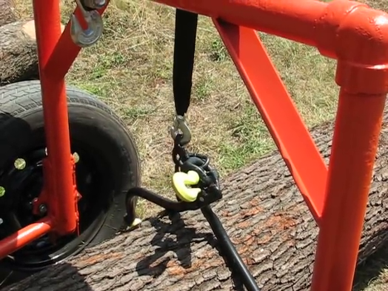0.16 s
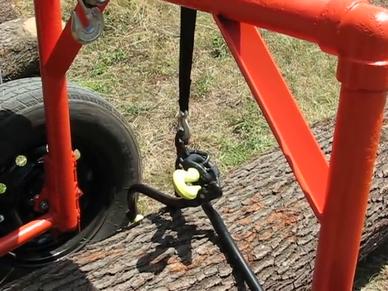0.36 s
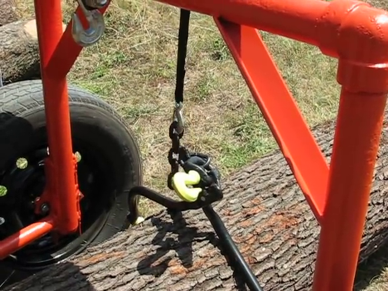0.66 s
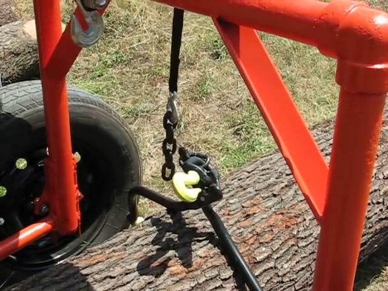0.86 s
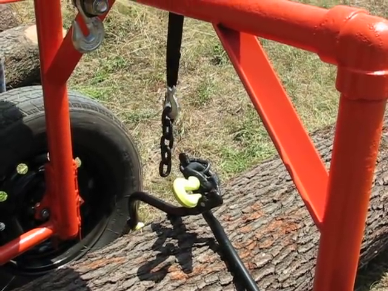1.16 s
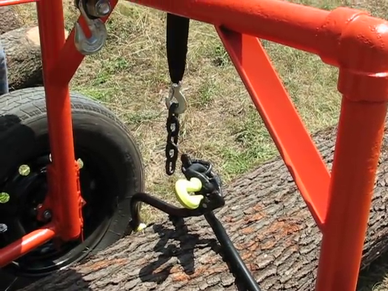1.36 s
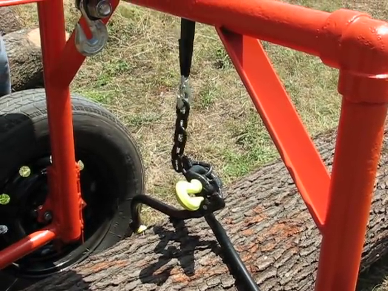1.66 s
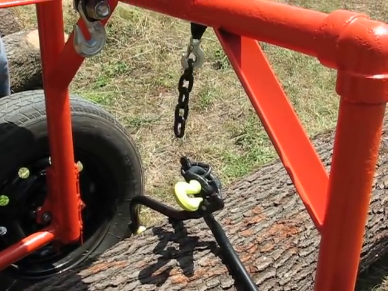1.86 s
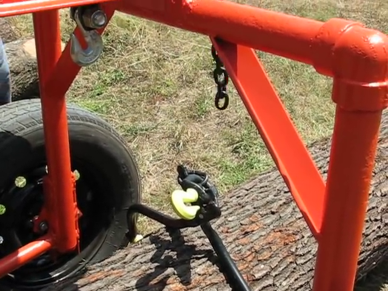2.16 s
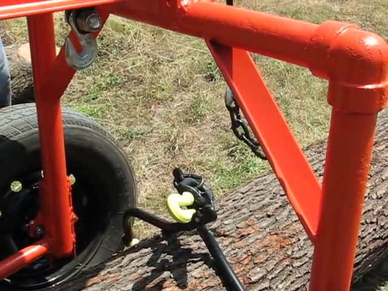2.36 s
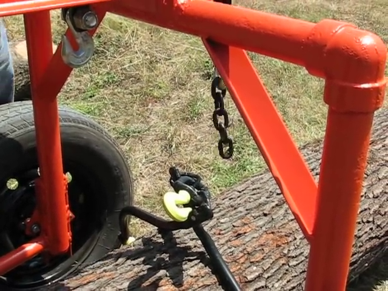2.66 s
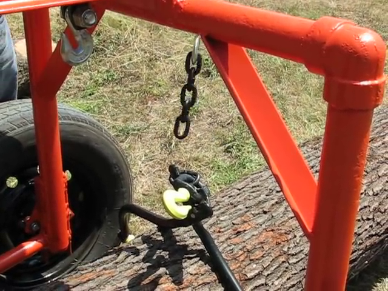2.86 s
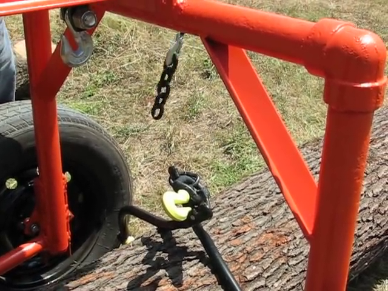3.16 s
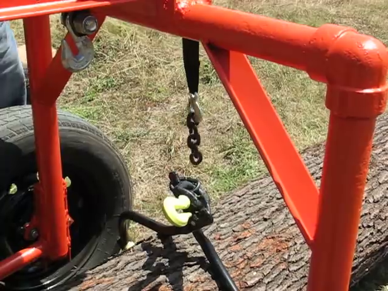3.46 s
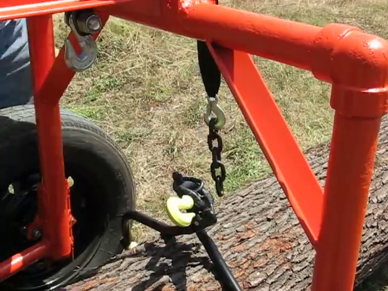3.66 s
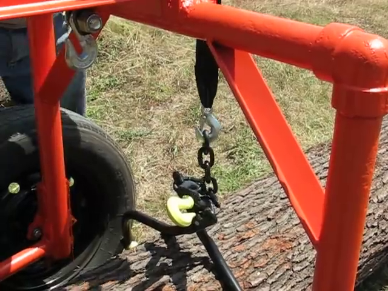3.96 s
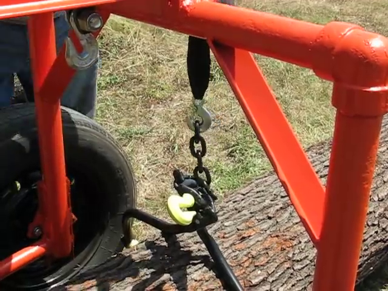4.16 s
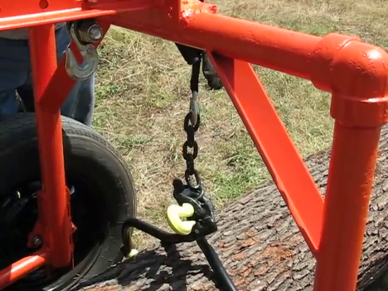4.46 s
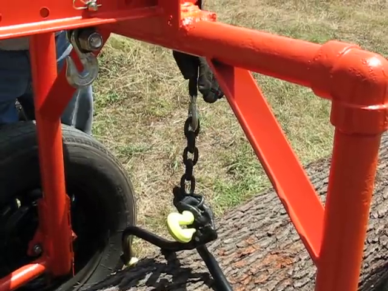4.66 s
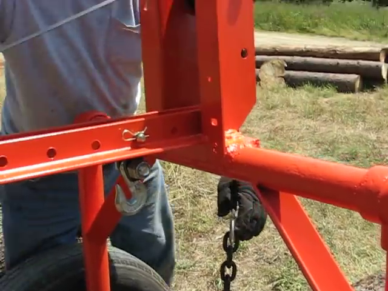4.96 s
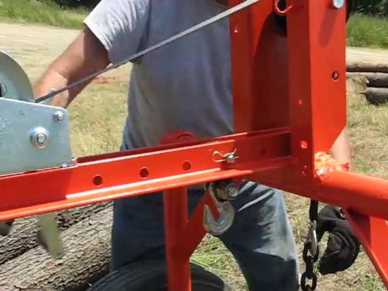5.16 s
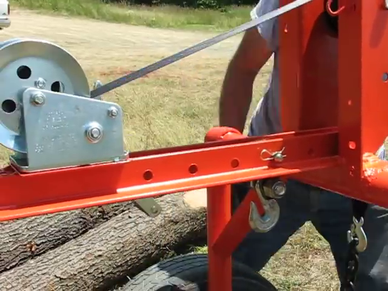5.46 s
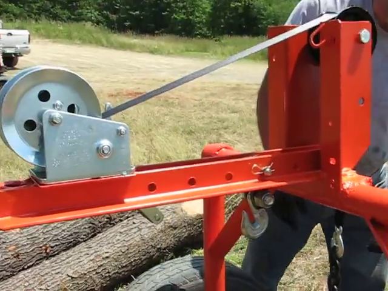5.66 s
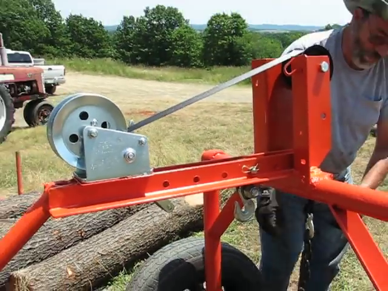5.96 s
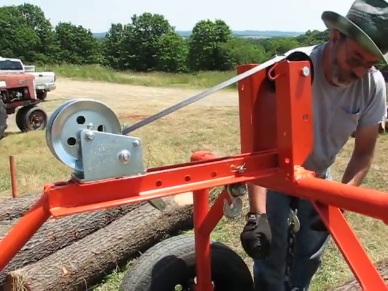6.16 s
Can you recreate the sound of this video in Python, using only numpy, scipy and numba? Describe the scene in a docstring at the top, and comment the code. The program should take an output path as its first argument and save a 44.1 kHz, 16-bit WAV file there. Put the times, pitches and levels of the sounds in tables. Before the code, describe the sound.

Loud, crisp metal clicks come in two bursts as a hand-cranked winch ratchets in an open field, heard from close up. Between the bursts there are small steel knocks, light clinks of swinging chain and a barely audible bird. The second burst is longer and quickens near its end, finishing with ringing clunks from the steel frame and a quiet bump. Faint wind and a far engine hum sit behind it all.

```python
"""Hand winch on a steel log arch

The winch is cranked in two bursts outdoors: each impact of the pawl on a ratchet tooth excites the
modes of winch and arch. Between the bursts the lifted chain swings and clinks and a bird calls; a dull
bump comes last. Light wind and a distant engine lie underneath. The close camera whines faintly and
rises near the end; its gain control ducks at loud clicks and creeps back in the pauses."""
import sys
import numpy as np
from scipy import signal
from scipy.fft import rfft, irfft, next_fast_len
from scipy.io import wavfile
from scipy.ndimage import uniform_filter1d, map_coordinates
from numba import njit

SR = 44100
rng = np.random.default_rng(int(sys.argv[2]) if len(sys.argv) > 2 else 0)


def bounce(signal):
    """Save signal as a 16-bit WAV file at the path given by the first command-line argument."""
    frames = np.transpose(np.atleast_2d(signal))
    limited = np.clip(frames, -1, 1)
    pcm = np.round(limited * 32767).astype(np.int16)
    wavfile.write(sys.argv[1], SR, pcm)


N = 278712
TIME = np.arange(N) / SR
AGE = np.arange(SR * 3 // 4) / SR  # time after a blow, s
SIDES = np.array([[.5], [-.5]])  # splits a left-right difference between the microphone ports

# long-lived modes of the arch: f/Hz, level/dB, t60/s
ARCH_MODES = [(328, -54, .5), (372, -55, .4), (435, -54, .35), (598, -56, .46), (770, -54, .35),
              (829, -53, .5), (1060, -43, .3), (1540, -48, .5), (1875, -43, .22), (2200, -45, .3),
              (3273, -41, .4), (3305, -46, .3), (3413, -41, .3), (6245, -41, .5), (6350, -42, .4),
              (6500, -42, .3), (6750, -43, .28), (8495, -38, .2), (11628, -46, .17), (14310, -55, .3)]
# spectrum of the clattering winch plates: f/Hz, level/dB
CLATTER_SPECTRUM = [(100, -45), (400, -21.5), (750, -15), (1150, 7), (1420, 2.5), (2400, -3), (3300, -4),
                    (4300, 3), (5600, -1.5), (7200, 1), (9000, -5), (9800, -9), (12300, -8), (15500, -29.5)]
# spectrum of a knock on steel: f/Hz, level/dB
KNOCK_SPECTRUM = [(80, -35.5), (250, -8), (450, -0.5), (750, -4.5), (1100, -1), (2100, 1.5), (3000, -3.5),
                  (4300, -0.5), (7500, -8), (14000, -40.5)]
# a hard crack on the first ratchet click after each pause: t/s, level/dB, t60/s, slack knock level/dB
SHARP_CRACKS = [(0.0262, 12, 0.011, -39), (.508, 9, 0.013, -28), (3.559, 0.5, 0.028, -24.5)]


def amp(db):
    """Amplitude ratio of a level in decibels."""
    return 10 ** (np.asarray(db) / 20)


def unit(x):
    """Normalisation to rms 1."""
    return x / np.sqrt(np.mean(x ** 2) + 1e-20)


def along(points, hz):
    """Interpolation of (f/Hz, value) points on a logarithmic frequency axis."""
    f, v = np.transpose(points)
    return np.interp(np.log(hz + 1), np.log(f + 1), v)


def fade(t60):
    """Exponential decay, by 60 dB in t60 seconds."""
    return np.exp(-np.log(1000) * AGE / t60)


def rise(tau):
    """Exponential build-up with a time constant of tau seconds."""
    return 1 - np.exp(-AGE / tau)


def tone(hz):
    """A sinusoid whose phase is the integral of its frequency."""
    return np.sin(2 * np.pi * np.cumsum(hz) / SR)


def wobble(rate):
    """Smooth random fluctuation through `rate` values a second."""
    return map_coordinates(rng.standard_normal(200), [TIME * rate], mode="mirror")


def add(track, s, sound):
    """Superposition of a sound on a stereo track at s seconds."""
    start = max(round(s * SR), 0)
    track[:, start:start + sound.shape[-1]] += sound[..., :N - start]


def filtered(x, response):
    """Linear filtering: the spectrum is multiplied by a frequency response."""
    n = x.shape[-1]
    m = next_fast_len(n + 2048)
    return irfft(rfft(x, m) * response(np.fft.rfftfreq(m, 1 / SR)), m)[..., :n]


def shaped(x, curve):
    """Zero-phase filtering by a curve of (f/Hz, gain/dB) points."""
    return filtered(x, lambda hz: amp(along(curve, hz)))


def noise(spectrum, size, bright_db=0):
    """Partly coherent stereo noise of rms 1; brightness tilts the treble against the middle."""
    # likeness of the two ports: f/Hz, correlation
    coherence = [(100, 1), (1200, 0.73), (2500, 0.75), (4500, 0.38), (7000, 0.28), (12000, 0.68)]

    def mid_side(hz):
        turn = np.arccos(np.clip(along(coherence, hz), -1, 1)) / 2
        tilt = bright_db * along([(1500, 0), (7000, 1)], hz)
        return amp(along(spectrum, hz) + tilt) * np.array([np.cos(turn), np.sin(turn)])
    mid, side = filtered(rng.standard_normal((2, size)), mid_side)
    return unit(np.array([mid + side, mid - side]))


def damped(x, t60s):
    """Frequency-dependent damping: each band decays at its own rate."""
    hz, t, bands = signal.stft(x, SR, nperseg=128)
    decay = np.exp(-np.log(1000) * t / along(t60s, hz)[:, None])
    return signal.istft(bands * decay, SR, nperseg=128)[1][:, :x.shape[-1]]


def ring(modes, scatter_db, spread_rad):
    """Free vibration as a sum of damped modes, scattered in level and in phase at each port."""
    out = np.zeros((2, len(AGE)))
    for hz, db, t60, *pan in modes:
        t = AGE[AGE < 1.2 * t60]
        strength, left, right = rng.standard_normal(3)
        phase = rng.uniform(0, 2 * np.pi) + spread_rad * np.array([[left], [right]])
        gain = amp(db + scatter_db * strength + sum(pan) * SIDES)
        out[:, :len(t)] += gain * np.sin(2 * np.pi * hz * t + phase) * fade(t60)[:len(t)]
    return out * rise(0.0004)


def wind():
    """Turbulence buffets each port independently, in gusts that rise fast and die slowly."""
    # gust crests: t/s, level/dB
    gusts = [(.35, -57.5), (1.88, -43), (2.65, -59), (3.17, -48.5)]
    # spectrum of the turbulent pressure: f/Hz, level/dB
    buffet = [(20, -2), (50, 3), (100, 4.5), (200, -22.5), (500, -31), (1500, -68.5)]
    calm_db, rise_s, fall_s = -61.5, 0.055, 0.2
    strength = amp(calm_db)
    for s, db in gusts:
        strength += amp(db) * np.exp(-np.maximum((s - TIME) / rise_s, (TIME - s) / fall_s))
    eddies = amp(2 * np.array([wobble(12), wobble(16)]))
    pressure = unit(eddies * shaped(rng.standard_normal((2, N)), buffet))
    return strength * pressure * amp([[2], [-2.5]])


def engine():
    """A distant engine radiates two wavering spectral lines over low broadband noise."""
    # engine lines: f/Hz, level against the noise/dB
    lines = [(132, -4), (179, -5.5)]
    # spectrum of the drone: f/Hz, level/dB
    drone = [(60, -16.5), (105, -20.5), (132, 1.5), (152, -2.5), (180, 1.5), (230, -7), (370, -5),
             (500, -16), (800, -7), (1150, -16), (3000, -49.5)]
    # envelope of the drone: t/s, level/dB
    envelope = [(.4, -51.5), (1.85, -59), (2.65, -56), (3.5, -55.5), (5.6, -48), (6.3, -55.5)]
    hum = sum(amp(db + 2.2 * wobble(13)) * tone(hz * (1 + .015 * wobble(13))) for hz, db in lines)
    return amp(np.interp(TIME, *np.transpose(envelope))) * (noise(drone, N) + hum)


def field_air():
    """The ambient sound of the open field is stationary noise."""
    # ambient spectrum: f/Hz, level/dB
    ambient = [(100, 1), (400, -1), (800, -8), (1500, -6), (3000, -7.5), (5500, -11), (8000, -7),
               (9300, -18.5), (16000, -22)]
    return amp(-53.5) * noise(ambient, N)


def knocks():
    """Play in crank and gears causes impacts, the brighter the shorter, that excite the arch."""
    # impacts of loose steel parts: t/s, level/dB, brightness/dB
    impacts = [(.135, -30, -8.5), (0.186, -14.5, -7), (.237, -32, -15), (1.487, -20, 17),
               (1.634, -23.5, 11), (2.03, -29, 17.5), (2.167, -28.5, -1), (3.137, -37, 15.5),
               (5.377, -17, 15), (5.476, -14.5, 7), (5.489, -5.5, 1.5), (5.598, -26.5, -15),
               (5.628, -31.5, 0), (6.1, -42.5, 17)]
    slack_s, halving_db = 0.029, 14.5  # lead of the gears' knock on a crack; brightness that halves t60
    slack = [(s - slack_s, db, 0) for s, _, _, db in SHARP_CRACKS]
    out = np.zeros((2, N))
    for s, db, bright_db in impacts + slack:
        t60 = 0.08 * .5 ** (bright_db / halving_db)
        knock = noise(KNOCK_SPECTRUM, len(AGE), bright_db) * fade(t60)
        arch = ring(ARCH_MODES, scatter_db=3, spread_rad=0.88)
        arch = shaped(arch, [(500, 7), (1500, 4), (6500, -8.5)])
        add(out, s, amp(db + 2) * (knock + amp(9) * arch) * rise(0.036 * t60))
    return out


def ratchet():
    """Impact excitation: the pawl strikes each tooth; force and pace set the level and the spectrum."""
    # the pawl drops on a tooth: t/s
    drops = [0.0261, .508, .570, .626, .683, .735, .786, .839, 0.8997, .963, 1.027, 1.099, 1.1711, 1.2356,
             1.298, 1.378, 3.559, 3.63, 3.712, 3.833, 3.939, 4.029, 4.1265, 4.214, 4.275, 4.321, 4.367,
             4.426, 4.492, 4.5682, 4.670, 4.7773, 4.869, 4.935, 4.990, 5.037, 5.081, 5.122, 5.163, 5.209,
             5.271]
    # force on the crank: t/s, level/dB
    force = [(0, 9), (.62, 8.5), (.96, 18), (1.38, 17.5), (3.6, 15), (4.3, 12.5), (4.6, 17), (5.1, 14.5),
             (5.27, 22.5)]
    # damping of the winch plates: f/Hz, t60/s
    plate_decay = [(300, 0.091), (1200, 0.027), (2500, 0.11), (4500, 0.049), (7000, 0.063), (12000, 0.032)]
    # spectrum of loose parts rattling on the arch: f/Hz, level/dB
    rattle = [(150, -26), (350, -5.5), (480, -0.5), (620, -4.5), (800, 1), (1200, -1.5), (2500, -7),
              (6000, -31.5)]
    # stereo balance of the impact noise: f/Hz, left minus right/dB
    balance = [(200, 12.5), (700, 2.5), (1300, 2.5), (2500, -2.5), (4200, 3.5), (5600, 1.5), (7000, 5.5),
               (9000, -3.5), (10500, -1.5), (12000, 11), (15000, 19.5)]
    # modes of pawl, ratchet wheel and drum: f/Hz, level/dB, t60/s, left minus right/dB
    winch_modes = [(1163, -28, 0.06, 0), (1238, -27, 0.076, 2), (1550, -27, 0.083, 0), (1776, -33, 0.1, -1),
                   (1906, -32, 0.087, -1), (2261, -29, 0.06, -2), (2412, -27, 0.06, -4),
                   (2530, -27, 0.09, -5), (3015, -31, 0.1, -4), (3295, -33, 0.1, 3), (3424, -32, 0.1, 1),
                   (3714, -13, 0.046, 4), (3854, -15, 0.048, 6), (4081, -23, 0.058, 8),
                   (4350, -9, 0.039, 6), (4457, -20, 0.065, 3), (4996, -21, 0.05, 7), (5706, -31, 0.097, 7),
                   (6051, -25, 0.1, 7), (6148, -25, 0.06, 4), (6901, -29, 0.086, 1), (7009, -22, 0.051, 7),
                   (7300, -25, 0.077, 0), (7547, -31, 0.06, 3), (7709, -26, 0.069, -2), (8495, -30, 0.1, 0),
                   (8818, -31, 0.076, -3), (9022, -29, 0.071, -2), (11628, -33, 0.072, 9),
                   (12575, -30, 0.041, 12)]
    # response of the arch to a blow: f/Hz, gain/dB
    arch_response = [(350, -1), (800, -0.5), (1060, -3.5), (1540, 1), (2200, 1.5), (3300, 1.5),
                     (6300, -3.5), (8500, -0.5), (12000, -2.5)]
    thump_spectrum = [(30, -27), (150, -11.5), (400, -6.5), (1500, -15), (5000, -27.5)]  # f/Hz, level/dB
    usual_wait_s, standstill_s = 0.075, 0.084  # from tooth to tooth
    hardness, usual_force_db = 0.24, 13  # dB of spectral tilt per dB of force above the usual
    levels = np.interp(drops, *np.transpose(force))
    tilts = hardness * (levels - usual_force_db)
    waits = np.minimum(np.diff(drops, prepend=-np.inf), standstill_s)
    teeth = list(zip(drops, levels, tilts, np.log2(waits / usual_wait_s)))
    out, arch = np.zeros((2, N)), np.zeros((2, N))
    size, slip_size = SR // 5, SR // 100
    chatter = 1 - 0.95 * np.exp(-AGE[:size] / 0.0034)  # rebounds keep feeding the plates
    for s, db, tilt_db, slowness in teeth:
        bright_db = 4 + 2 * slowness + tilt_db  # a slow tooth falls harder
        thump_db = -40 + 1.5 * slowness + 7.5 * rng.uniform(-0.91, 1)
        clatter = amp(-9) * chatter * damped(noise(CLATTER_SPECTRUM, size, bright_db), plate_decay)
        thump = amp(thump_db) * noise(thump_spectrum, size) * fade(0.032)[:size]
        add(out, s, amp(db) * (clatter + thump))
        # just before the drop, the tip slides off the tooth
        slip = damped(noise(CLATTER_SPECTRUM, size, bright_db=-12.5), plate_decay)[:, :slip_size]
        add(out, s - slip_size / SR, amp(db - 29.5) * slip * np.linspace(0, 1, slip_size) ** 2)
        add(out, s, amp(db - 42.5) * noise(rattle, len(AGE)) * fade(0.38))
    out = filtered(out, lambda hz: amp(along(balance, hz) * SIDES))
    for s, db, tilt_db, slowness in teeth:
        pawl_db = -2 - slowness  # the pawl's modes, near 4 kHz, ring more freely at a fast pace
        drum_db = -tilt_db  # load damps the drum's modes, below 2 kHz
        detune = 1 + 0.0017 * rng.standard_normal(len(winch_modes))  # no two teeth seat alike
        modes = [(hz * ratio, level + pawl_db * (3600 < hz < 4600) + drum_db * (hz < 2000), t60, pan)
                 for ratio, (hz, level, t60, pan) in zip(detune, winch_modes)]
        add(out, s, amp(db + .5) * ring(modes, scatter_db=3, spread_rad=0.22))
        add(arch, s, amp(db - 1.5) * ring(ARCH_MODES, scatter_db=4, spread_rad=0.67))
    return out + shaped(arch, arch_response)


def cracks():
    """A brief broadband transient makes the first ratchet click after each pause hard and sharp."""
    out = np.zeros((2, N))
    for s, db, t60, _ in SHARP_CRACKS:
        crack = noise(CLATTER_SPECTRUM, len(AGE), bright_db=1)
        add(out, s, amp(db) * crack * fade(t60) * rise(0.00057))
    return out


def bearing():
    """Friction in the dry crank bearing gives short tones of unsteady pitch."""
    # squeaks: centre t/s, f/Hz, level/dB, length/s
    squeaks = [(0.464, 772, -40.5, 0.05), (4.013, 1173, -22.5, 0.057), (4.968, 1207, -21, 0.069)]
    out = np.zeros((2, N))
    for s, hz, db, length in squeaks:
        swell = np.hanning(int(length * SR))
        waver = unit(uniform_filter1d(rng.standard_normal(len(swell)), size=100))
        add(out, s - length / 2, amp(db) * swell * tone(hz * (1 + 0.022 * waver)))
    return out


def chain():
    """Swinging links scrape by friction; the harder they touch, the more their modes dominate."""
    # links touch: t/s, level/dB, t60 of the scrape/s
    touches = [(1.85, -43.5, 0.46), (2.143, -38.5, .17), (2.234, -40.5, .08), (2.37, -46, 0.35),
               (2.88, -43.5, 0.24), (2.908, -36.5, 0.081), (2.926, -33, .05)]
    # modes of a link: f/Hz, level/dB, t60/s
    link_modes = [(4770, -17, .3), (5642, -17, .29), (5835, -16, .35), (6126, -11, .15), (6465, -4, .13),
                  (6821, -3, .3), (7235, -5, .1), (7440, -7, .13), (8646, 0, .12)]
    # spectrum of the scrape: f/Hz, level/dB
    friction = [(500, -17), (2500, -1.5), (4500, -3.5), (6500, 11.5), (8700, 5), (10000, -9), (15000, -13)]
    out = np.zeros((2, N))
    for s, db, t60 in touches:
        scrape = noise(friction, len(AGE)) * fade(t60)
        link = amp(28.5 + 0.9 * db) * ring(link_modes, scatter_db=1.5, spread_rad=.7)
        add(out, s, amp(db + 7.5) * (scrape + link) * rise(0.099 * t60))
    return out


def bird():
    """A far bird whistles gliding tones, randomly modulated in frequency and amplitude."""
    # whistles: t/s, length/s, start f/Hz, end f/Hz
    whistles = [(2.27, .1, 4700, 3950), (2.44, .1, 4000, 3450), (2.55, .06, 3200, 2950),
                (3.02, .06, 2900, 3400), (3.37, .08, 3400, 3950)]
    out = np.zeros((2, N))
    for s, length, start_hz, end_hz in whistles:
        size = int(length * SR)
        waver, flutter = (unit(uniform_filter1d(rng.standard_normal(size), size=200)) for _ in range(2))
        pitch = np.linspace(start_hz, end_hz, size) * (1 + .025 * waver)
        add(out, s, amp(-58.5 + 2 * flutter) * np.hanning(size) * tone(pitch))
    return out


def bump():
    """A soft blow excites only the low modes of the arch, with a faint contact noise."""
    # low modes of the arch: f/Hz, level/dB, t60/s
    low_modes = [(143.6, -41, 0.12), (191.3, -31, 0.059), (315.4, -43, 0.414), (339.6, -38.5, 0.21),
                 (737, -31.5, 0.023), (840, -37, 0.034)]
    out = np.zeros((2, N))
    body = amp(6.5) * ring(low_modes, scatter_db=1, spread_rad=.3) * rise(.003)
    contact = amp(-39.5) * noise(KNOCK_SPECTRUM, len(AGE)) * fade(0.11)
    add(out, s=6.201, sound=body + contact)
    return out


def yard(x):
    """Scattering from ground, logs and machines gives a short reverberant tail."""
    # reverberation time: f/Hz, t60/s
    decay = [(200, 0.57), (1500, 0.25), (4000, 0.16), (7000, 0.26), (12000, 0.038)]
    tail = damped(rng.standard_normal((2, SR // 2)), decay) * rise(0.061)[:SR // 2]
    return signal.fftconvolve(x, tail / np.linalg.norm(tail[0]), axes=1)[:, :N]


def camera_lift(x):
    """Timbre depends on the receiver's position: it shifts as the camera rises from log to top beam."""
    # response at the raised position: f/Hz, gain/dB
    raised = [(40, -3), (130, -4.5), (250, 1), (450, -1), (800, 4.5), (1500, -1), (2400, 1.5), (5600, 0),
              (12000, 1)]
    middle_s, length_s = 5.0, .5
    height = np.clip((TIME - middle_s) / length_s + .5, 0, 1)
    return (1 - height) * x + height * shaped(x, raised)


def scene():
    """The sources superpose; the winch stands a little to the left, so the left port leads in phase."""
    # phase lead of the left port: f/Hz, phase/rad
    lead = [(200, 0.18), (1300, 0.12), (2200, 0.11), (3200, 1.6), (3800, 2.2), (5000, 1.66), (6300, 1.5),
            (7200, 1.7), (8500, 0.75), (9500, 2.4), (11000, 5.3), (15000, 1.2)]
    winch = ratchet() + knocks() + bearing() + cracks()
    winch = filtered(winch, lambda hz: np.exp(1j * along(lead, hz) * SIDES))
    steel = winch + chain() + bump()
    return camera_lift(steel + amp(-29) * yard(steel) + bird() + wind() + engine() + field_air())


@njit
def gain_control(excess_db, attack_s, release_db_per_s):
    """Peak limiting: the gain reduction, in dB, jumps towards the excess and sinks at a steady rate."""
    out, held = np.zeros(len(excess_db)), 0.
    for i in range(len(excess_db)):
        held = max(held - release_db_per_s / SR, 0.)
        if excess_db[i] > held:
            held += (excess_db[i] - held) / (attack_s * SR)
        out[i] = held
    return out


def record(dry):
    """The camera adds its whine, compresses peaks, clips their overshoot and limits the bandwidth."""
    # tones of the whine: f/Hz, level/dB
    whine = [(8250, -58), (8280, -68)]
    threshold_db, top_hz = -4, 16300
    x = dry + sum(amp(db) * np.sin(2 * np.pi * hz * TIME) for hz, db in whine)
    excess_db = 20 * np.log10(np.abs(x).max(0) / amp(threshold_db) + 1e-9)
    cut_db = gain_control(excess_db, attack_s=0.00063, release_db_per_s=21)
    x = x * amp(-uniform_filter1d(cut_db, size=24))
    return filtered(np.clip(x, -1, 1), lambda hz: hz < top_hz)


dry = scene()
out = record(dry)
bounce(out)
```